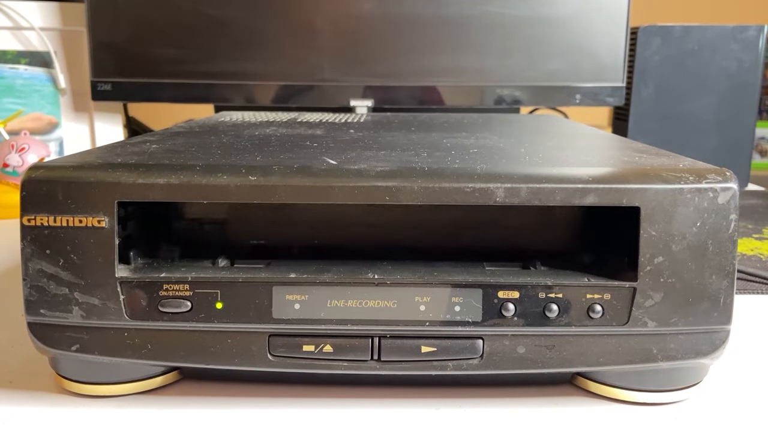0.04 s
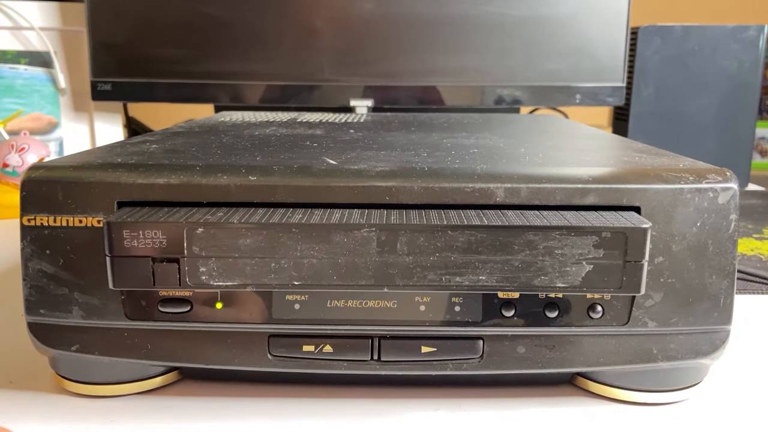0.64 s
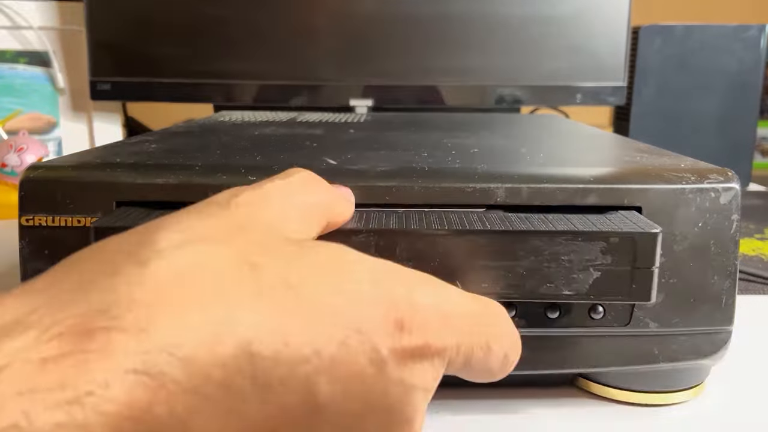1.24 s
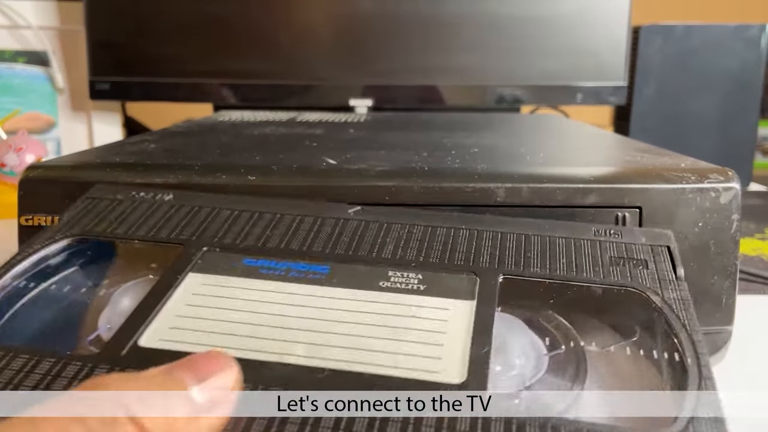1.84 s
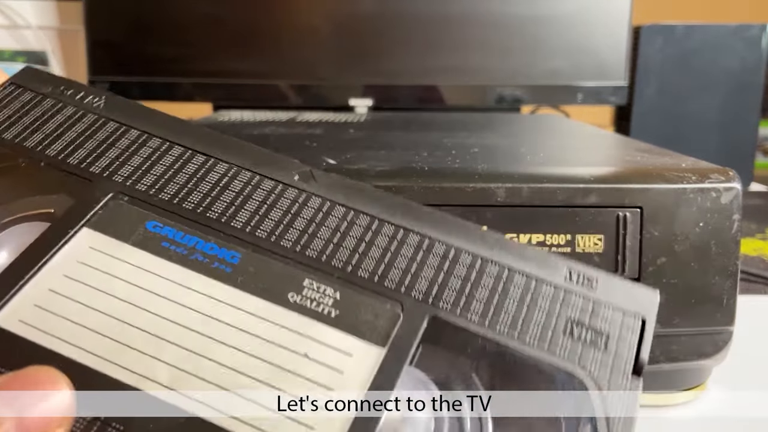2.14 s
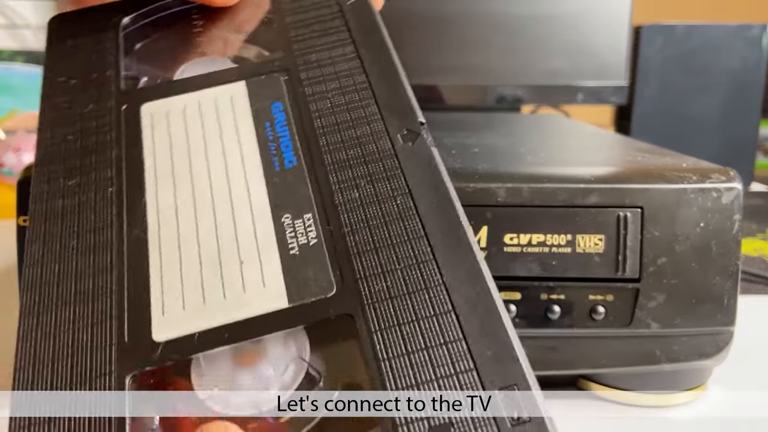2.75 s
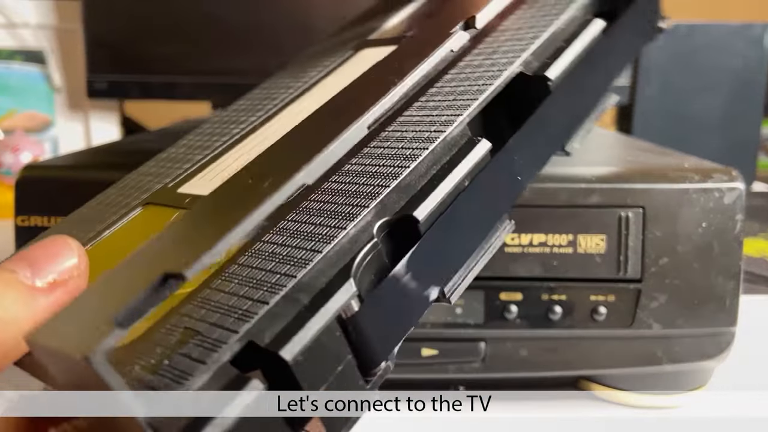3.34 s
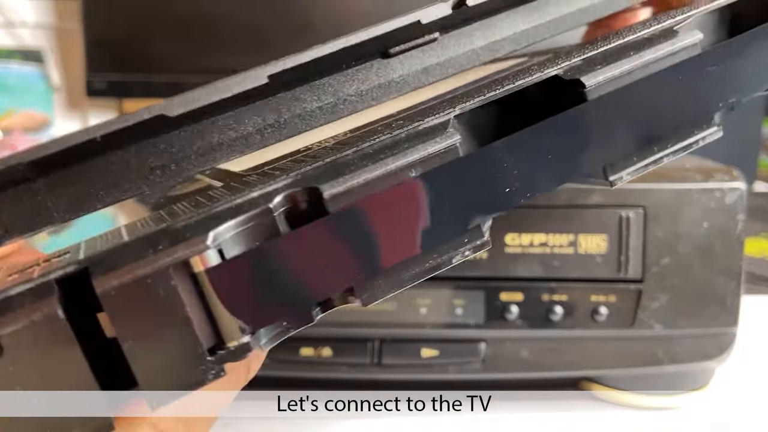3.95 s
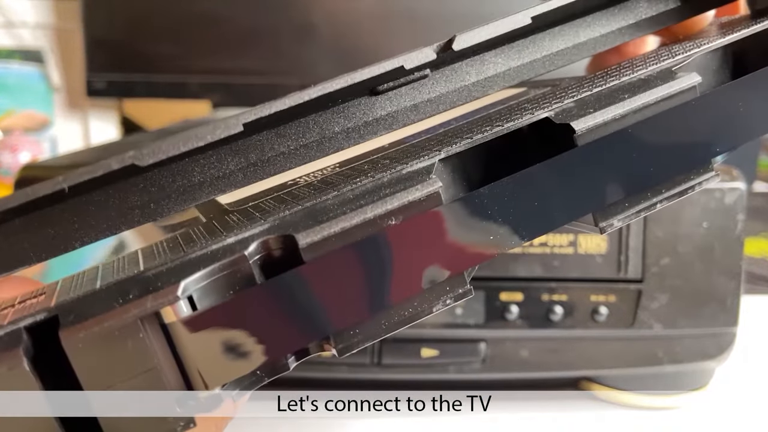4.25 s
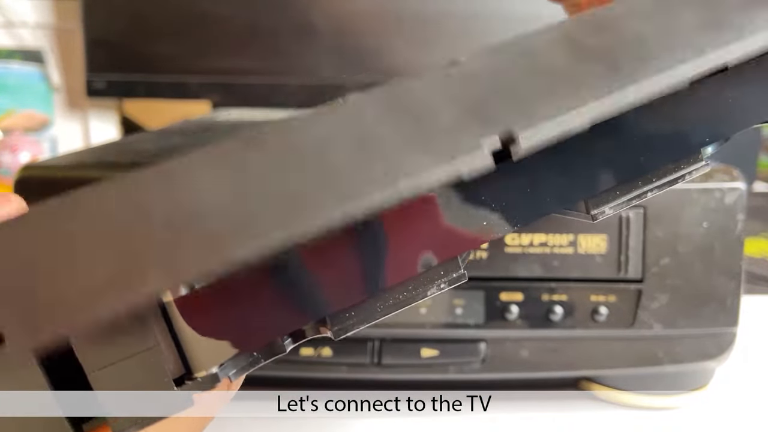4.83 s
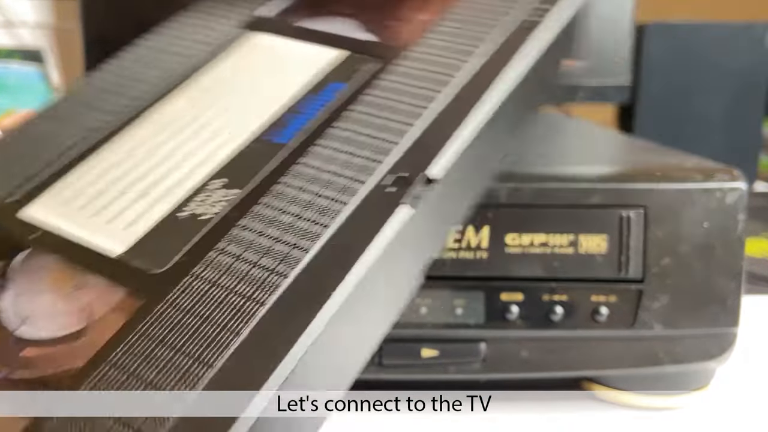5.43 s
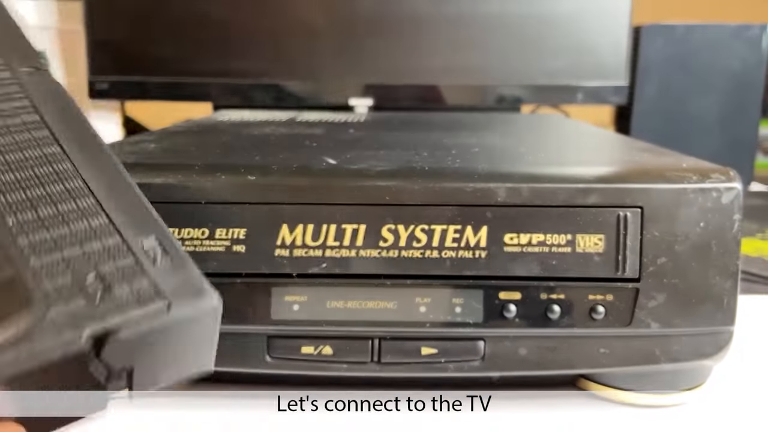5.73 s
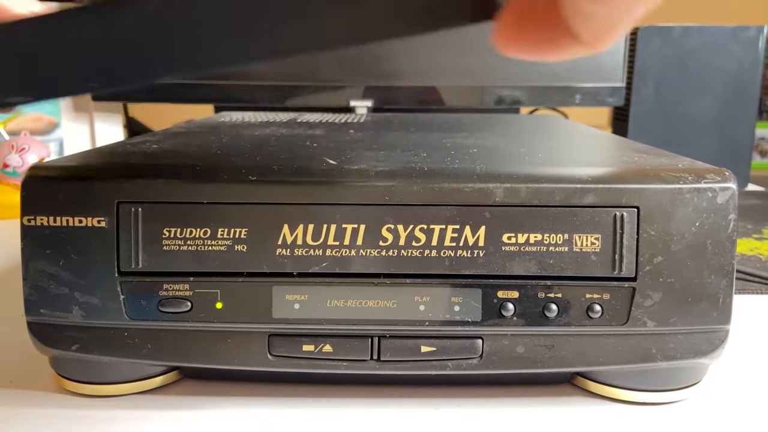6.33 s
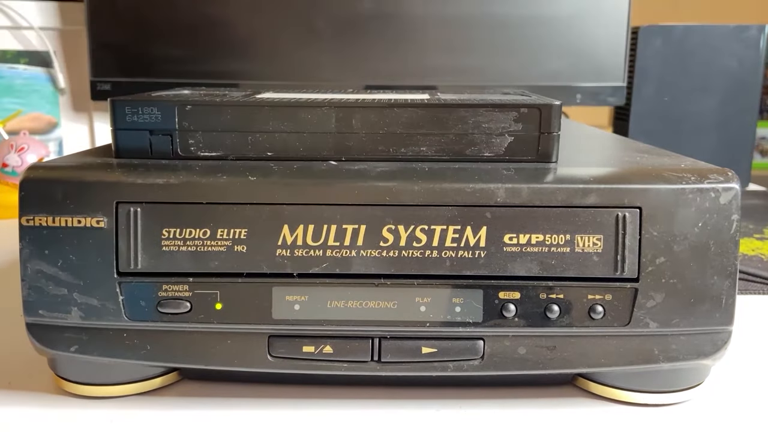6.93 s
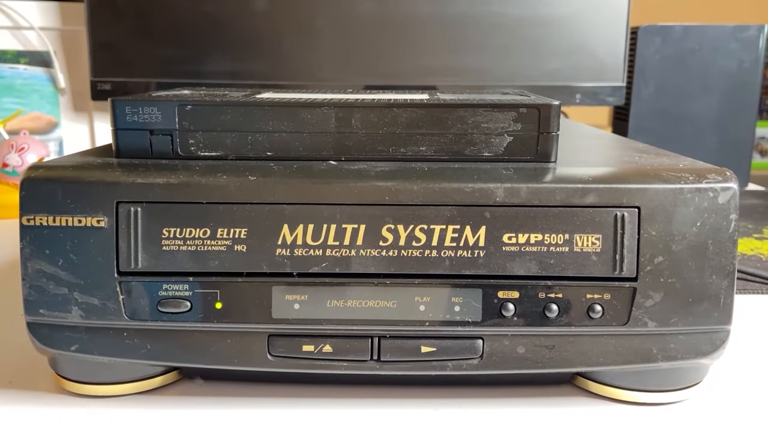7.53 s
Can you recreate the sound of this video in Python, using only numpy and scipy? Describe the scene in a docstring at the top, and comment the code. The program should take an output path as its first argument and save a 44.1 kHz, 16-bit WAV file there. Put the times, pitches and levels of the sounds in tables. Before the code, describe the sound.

Levers clack as a videotape ejects, then the plastic cassette scrapes out, rattles in the hand, snaps its flap and bumps down.

```python
"""A video cassette player on a table ejects its tape: the motor whirs, levers clack, the steel cover rings.
A hand drags the cassette out, scraping it over the slot, and turns it over so the loose reels rattle.
A spring snaps the cassette's flap shut, and the hand lays the cassette on the player with soft bumps.
Two close microphones hear it all in a small, quiet room."""
import sys
import numpy as np
from scipy import signal
from scipy.fft import rfft, irfft, next_fast_len
from scipy.io import wavfile
from scipy.ndimage import map_coordinates

SR = 44100
rng = np.random.default_rng(int(sys.argv[2]) if len(sys.argv) > 2 else 0)


def generate_wav(sig):
    """Save sig (samples, or channels by samples) to the path in sys.argv[1] as 16-bit PCM at SR."""
    pcm = np.round(np.clip(np.atleast_2d(sig).T, -1, 1) * 32767).astype(np.int16)
    wavfile.write(sys.argv[1], SR, pcm)


N = 338683
TIME = np.arange(N) / SR
HZ = np.fft.rfftfreq(2 * N, 1 / SR)
MOTOR_STOP_S = 0.49

# the eject levers clack over: (time [s], level [dB], click pitch [Hz], knock relative to level [dB])
LEVERS = [(0.267, -15, 3730, -13), (0.288, -27, 6260, -13.5), (0.308, -11.5, 5640, -13),
          (0.322, -18.5, 6000, -11.5), (0.461, -29, 6000, -5.5), (0.485, -17.5, 4900, 0.5)]
# the cassette catches in the slot and slides on: (time [s], catch level [dB], slide level [dB])
CATCHES = [(1.1062, -34, -46), (1.169, -36.5, -45.5), (1.2325, -34.5, -33.5), (1.404, -39, -36),
           (1.53, -29.5, -48), (1.6316, -25, -31.5), (1.718, -34.5, -46.5), (1.8752, -33.5, -64)]
# the loose reels knock as the grip shifts: (time [s], click level [dB], knock level [dB])
RATTLES = [(1.761, -33, -39.5), (1.84, -47, -41), (2.156, -36, -45), (2.17, -32.5, -40),
           (2.231, -40.5, -66), (2.552, -29.5, -42), (2.63, -32, -46.5), (2.684, -25, -50),
           (2.70, -22, -65), (2.708, -25, -33), (2.926, -37.5, -52.5), (2.977, -32.5, -55.5),
           (3.126, -32.5, -59), (3.173, -37, -47.5), (3.789, -50, -56), (4.633, -47.5, -54),
           (5.167, -35.5, -47.5), (5.187, -34, -48), (5.36, -45, -58.5), (5.399, -44, -49.5),
           (5.461, -43, -49), (5.488, -54, -54), (5.528, -19.5, -37.5), (5.568, -24, -43),
           (5.661, -45, -52.5), (7.323, -40.5, -56.5)]
# the cassette's corners land on the cover: (time [s], level [dB])
LANDINGS = [(6.591, -22.5), (6.629, -21), (6.685, -26), (6.695, -17), (6.704, -22)]
# soft, heavy bumps: (time [s], level [dB], pitch [Hz])
BUMPS = [(0.498, -21, 189), (0.532, -23, 200), (2.553, -30, 79.5), (3.688, -34, 78.5), (5.604, -34, 69),
         (6.242, -22.5, 85.4), (6.296, -30.5, 99.3), (6.598, -22, 111.5), (6.721, -12, 187.4),
         (6.731, -24.5, 64.4), (6.803, -31.5, 188), (7.291, -32, 158), (7.375, -24, 78.3),
         (7.54, -37.5, 55.4)]
# the tone colour of the cassette's plastic shell: (frequency [Hz], level [dB])
SHELL = [(80, -29), (170, -13), (330, -3), (500, -9), (720, -11), (1150, -15), (1500, -27), (1950, -20),
         (6000, -55)]


def player_blows():
    """Hard levers mostly click; the cassette rings the cover more as it catches and lands."""
    out = np.zeros((2, N))
    for s, db, centre_hz, knock_db in LEVERS:
        add(out, s, amp(db) * one_blow(centre_hz, knock_db, cover_db=-22.5, t60=0.061, rise=0.0004))
    for s, db, _ in CATCHES:
        add(out, s, amp(db) * one_blow(2330, knock_db=0, cover_db=-8, t60=0.074, rise=0.00084))
    for s, db in LANDINGS:
        add(out, s, amp(db) * one_blow(3920, knock_db=-4.5, cover_db=-11.5, t60=0.042, rise=0.00047))
    return out


def one_blow(centre_hz, knock_db, cover_db, t60, rise):
    """One hit on the player: the cover's ring, a click and a hollow knock."""
    out = amp(cover_db) * cover()
    add(out, 0, amp(-3) * click(centre_hz, t60, rise))
    add(out, 0, amp(knock_db) * contact(SHELL, t60=0.08, rise=0.00065))
    return out


def cover(blur_hz=16):
    """The steel cover rings once; its loose seams blur each note."""
    # the cover's notes: (pitch [Hz], level [dB], ring time [s])
    notes = [(199.1, -2, 0.35), (274.4, -15, 0.72), (337, -7.5, 0.48), (375.6, -2.5, 0.44),
             (457.3, -6, 0.42), (759, -11, 0.2264)]
    t = TIME[:SR]
    drift = np.cumsum(rng.standard_normal((len(notes), SR)), axis=1) * np.sqrt(2 * np.pi * blur_hz / SR)
    tones = sum(amp(db + rng.normal(0, 2.6)) * fade(t, t60) * np.sin(2 * np.pi * hz * t + phase)
                for (hz, db, t60), phase in zip(notes, drift))
    return tones * fade_in(t, 0.0063) * np.ones((2, 1))


def springs():
    """Springs and thin parts inside the player sing on after a jolt."""
    # ringing parts: (time [s], level [dB], pitch [Hz], ring time [s])
    notes = [(0.498, -36, 254.9, 0.65), (1.65, -42, 338.3, 1.84)]
    out, t = np.zeros((2, N)), TIME[:2 * SR]
    for s, db, hz, t60 in notes:
        tone = np.sin(2 * np.pi * hz * t + 0.5 * wobble(24)[:len(t)])
        add(out, s, amp(db) * fade(t, t60) * tone * np.ones((2, 1)))
    return out


def motor(teeth_hz=392, coast_t60=0.82):
    """The gears chatter once a tooth and shake the frame; the motor strains at each lever, then coasts."""
    # where the gears ring: (frequency [Hz], level [dB])
    gears = [(754, 3.5), (1150, 2.5), (1560, -1.5), (2400, -10.5), (3420, -20.5), (6580, -17.5)]
    # the frame's tone colour: (frequency [Hz], level [dB])
    frame = [(25, -43.5), (59, 6), (140, -6.5), (205, 0.5), (299, -8.5), (385, -3.5), (560, -27),
             (1500, -52)]
    strain_db = 4.5 * np.max([swell(s, width=0.033) for s, *_ in LEVERS], axis=0)
    since_stop = np.maximum(TIME - MOTOR_STOP_S, 0)
    drive = amp(-40 + strain_db) * fade(since_stop, coast_t60)
    whir = amp(-54.5 + 1.5 * strain_db) * fade(since_stop, coast_t60 / 3)
    phase = 2 * np.pi * np.cumsum(teeth_hz * (1 + 0.0099 * wobble(12))) / SR
    chatter = rng.standard_normal((2, N)) * amp(2.8 * wobble(120))
    teeth = unit(resonant(chatter * (1 + amp(-8) * np.cos(phase)), gears, sharpness=7.2))
    whine = amp(-13) * drive * np.sin(phase) + amp(-11.5) * whir * np.sin(4 * phase)
    rumble = drive * friction(frame, grain_db=2.5, grain_rate=80)
    return rumble + amp(3.5) * whir * teeth + whine


def spin_down(start_hz=1060, sag_hz_per_s=300):
    """The freed gears slow down: a faint, rough whine sinks under a high whir that holds its pitch."""
    hz = np.maximum(start_hz - sag_hz_per_s * np.maximum(TIME - MOTOR_STOP_S, 0), 0)
    whir = amp(-68) * rough_tone(hz, width_hz=110) + amp(-76) * rough_tone(2780, width_hz=500)
    return jolt(MOTOR_STOP_S, rise=0.057, t60=1.8) * whir


def flap():
    """The spring slams the flap shut: it cracks and chatters, and the shell knocks and rings."""
    # the flap is let go and hits the shell: (time [s], crack level [dB], knock level [dB])
    hits = [(4.8801, -19.5, -39), (4.901, -4, -37.5), (4.902, -8.5, -23.5), (4.9032, -14.5, -9.5)]
    # the tone colour of its edge striking: (frequency [Hz], level [dB])
    edge = [(710, -36), (1400, -15), (1900, -4.5), (2500, -9.5), (2970, -1.5), (3600, -8.5), (5900, 0),
            (7800, -3), (11100, -6), (15500, -12)]
    out = np.zeros((2, N))
    knock = coloured(signal.unit_impulse(SR // 8), SHELL)
    knock = knock / np.abs(knock).max() * np.ones((2, 1))
    for s, crack_db, knock_db in hits:
        add(out, s, amp(crack_db) * contact(edge, t60=0.033))
        add(out, s, amp(knock_db) * knock)
        add(out, s, amp(knock_db - 10.5) * shell_ring(rise=0.0042))
    return out


def rattles():
    """Loose reels click and knock inside the shell and make it ring."""
    out = np.zeros((2, N))
    for s, click_db, knock_db in RATTLES:
        add(out, s, amp(click_db - 6) * click(centre_hz=2880, t60=0.03, rise=0.0016))
        add(out, s, amp(knock_db + 4) * contact(SHELL, t60=0.05, rise=0.02))
        add(out, s, amp(knock_db + 6) * shell_ring(rise=0.003, detune=0.019))
    return out


def latch():
    """The flap and its latch give short, bright ticks."""
    # ticks: (time [s], level [dB])
    ticks = [(1.664, -15.5), (2.155, -27), (3.0, -11.5), (3.72, -39.5), (5.61, -36.5), (6.042, -30.5)]
    out = np.zeros((2, N))
    for s, db in ticks:
        add(out, s, amp(db - 8) * click(centre_hz=8370, t60=0.016, rise=0.0011))
    return out


def shell_ring(rise, scatter_db=2, detune=0.027):
    """The shell rings a little differently wherever it is struck; its high notes shift most."""
    # the notes of its air and panels: (pitch [Hz], level [dB], ring time [s])
    notes = [(705.3, 0.5, 0.049), (783.6, -5.5, 0.05), (1155, -11, 0.054), (1855, -10, 0.028),
             (2870, -9.5, 0.034)]
    t, lowest_hz = TIME[:SR // 8], notes[0][0]
    tones = np.zeros((2, len(t)))
    for hz, db, t60 in notes:
        louder, higher = rng.standard_normal(2)
        pitch = hz * (1 + detune * higher * hz / lowest_hz)
        tones += amp(db + scatter_db * louder) * fade(t, t60) * np.sin(2 * np.pi * pitch * t)
    return tones * fade_in(t, rise)


def drag():
    """The ribbed shell shudders and scrapes over the lip of the slot, lurching on after each catch."""
    # the low shudder's tone colour: (frequency [Hz], level [dB])
    slot = [(25, -33.5), (65, 6.5), (136, -2), (320, 2.5), (400, 2.5), (540, -18.5), (720, -11.5),
            (1200, -45)]
    # the scrape's tone colour: (frequency [Hz], level [dB])
    lip = [(400, -44), (750, 3.5), (1170, 2), (1400, -1), (4300, -12.5), (7400, -14.5), (11700, -28.5),
           (14000, -59)]
    first, last = CATCHES[0][0], CATCHES[-1][0]
    pull = amp(-43.5) * arch(first, last - first) ** 2
    shudder = pull + sum(amp(db) * jolt(s, rise=0.0042, t60=0.8) for s, _, db in CATCHES)
    scrape = pull + sum(amp(db) * jolt(s, rise=0.0042, t60=0.43) for s, _, db in CATCHES)
    grit = friction(lip, grain_db=4.2, grain_rate=240)
    # a hollow note wanders as the touching point slides along the shell
    grit += amp(-6) * rough_tone(950 * np.exp(0.22 * wobble(16)), width_hz=200)
    return amp(-3) * shudder * friction(slot, grain_db=0.5, grain_rate=48) + amp(-9.5) * scrape * grit


def groans():
    """Where the shell sticks in the slot, one hollow note stands out, its pitch set by the spot."""
    # tight spots: (time [s], level [dB], pitch [Hz])
    spots = [(1.117, -46, 1158), (1.657, -31.5, 764), (1.723, -36, 1020)]
    return sum(amp(db) * swell(s, width=0.0075) * rough_tone(hz, width_hz=190) for s, db, hz in spots)


def bumps(ring_cycles=12.5):
    """Soft weight lands on the player or table: a few low notes die fast together, and the deepest bumps ring
    longest."""
    # the notes of one bump: (pitch [ratio], level [dB])
    notes = [(0.68, -15), (1, 0.5), (1.27, -11.5), (1.65, -11)]
    out, t = np.zeros((2, N)), TIME[:SR // 2]
    for s, db, hz in BUMPS:
        thud = sum(amp(level) * np.sin(2 * np.pi * hz * ratio * t + rng.uniform(0, 2 * np.pi))
                   for ratio, level in notes)
        soft_start = 1 - np.exp(-(t * hz) ** 2)
        add(out, s, amp(db) * thud * fade(t, ring_cycles / hz) * soft_start * np.ones((2, 1)))
    return out


def hands():
    """Skin hisses and rubs on the hollow shell: in strokes, at each rattle and as the cassette settles."""
    # fingers slide over the shell: (time [s], length [s], level [dB])
    slides = [(2.276, 0.11, -69), (2.463, 0.075, -63.5), (2.578, 0.06, -71), (2.795, 0.23, -72),
              (3.402, 0.11, -61), (3.137, 0.3, -76), (3.586, 0.1, -72), (3.871, 0.17, -86.5),
              (4.19, 0.059, -85), (4.696, 0.13, -71), (4.82, 0.27, -55.5), (5.349, 0.3, -68),
              (5.674, 0.19, -62.5), (5.872, 0.15, -61.5), (6.021, 0.23, -57), (6.953, 0.2, -65),
              (7.292, 0.094, -66)]
    # the tone colour of sliding skin: (frequency [Hz], level [dB])
    skin = [(590, -29.5), (1300, -5), (7000, -5.5), (15000, -13.5)]
    strokes = sum(amp(db) * arch(s, length) for s, length, db in slides)
    grips = sum(amp(db - 26.5) * swell(s + 0.018, width=0.075) for s, _, db in RATTLES)
    settling = sum(amp(db) * jolt(s, rise=0.004, t60=0.19) for s, db in LANDINGS)
    hiss_level = strokes + amp(-13) * grips + amp(-31) * settling
    rub_level = amp(-5.5) * strokes + grips + amp(-23) * settling
    snags = slips(rate=35, t60=0.04)
    hiss = hiss_level * friction(skin, grain_db=2.5, grain_rate=560) * (1 + 2 * snags)
    rub = rub_level * friction(SHELL, grain_db=4, grain_rate=63) * (1 + 4 * snags)
    return hiss + rub


def table():
    """The table rumbles dully: a little at rest, more as things are moved and after each bump."""
    # slow swells of rumble: (time [s], length [s], level [dB])
    moves = [(0.557, 0.57, -55), (2.05, 0.77, -54.5), (3.255, 0.88, -61.5), (5.29, 1.2, -52.5)]
    # the table's tone colour: (frequency [Hz], level [dB])
    colour = [(25, -43.5), (50, -7), (80, 0), (200, -18), (900, -54.5)]
    moving = sum(amp(db) * arch(s, length) for s, length, db in moves)
    bumped = sum(amp(db - 17.5) * jolt(s, rise=0.0037, t60=0.528) for s, db, _ in BUMPS)
    return amp(-4.5) * (amp(-63.5) + moving + bumped) * friction(colour, grain_db=5, grain_rate=20)


def room(pair):
    """The walls send back a wash of echoes; each frequency dies at its own speed."""
    # how long the room rings: (frequency [Hz], ring time [s])
    ring_times = [(100, 0.37), (1000, 0.53), (6000, 0.36), (13000, 0.26)]
    hz, t, noise = signal.stft(rng.standard_normal((2, SR)), SR, nperseg=256)
    dying = noise * fade(t, along(ring_times, hz)[:, None]) * fade_in(t, 0.0004)
    tail = signal.istft(dying, SR, nperseg=256)[1]
    one, other = signal.fftconvolve(pair, tail / np.linalg.norm(tail[0]), axes=1)[:, :N]
    return np.array([one + other, one - other]) / np.sqrt(2)


def background():
    """Still air and a faint electrical whine."""
    # the whine: (pitch [Hz], level [dB])
    whine = [(1099, -91)]
    # the air's tone colour: (frequency [Hz], level [dB])
    air = [(25, -13.5), (83, -19.5), (300, -12.5), (1090, -21), (1400, -25.5), (7500, -36.5),
           (15000, -47.5)]
    tones = sum(amp(db) * np.sqrt(2) * np.sin(2 * np.pi * hz * TIME + 0.5 * wobble(4.5))
                for hz, db in whine)
    return amp(-78) * unit(coloured(rng.standard_normal((2, N)), air)) + tones


def click(centre_hz, t60, rise):
    """Hard plastic is hit; a higher centre sounds brighter."""
    colour = [(centre_hz / 10, -20), (centre_hz / 2, -3), (centre_hz, 0),
              (centre_hz * 2, -8), (centre_hz * 4, -22)]
    return contact(colour, t60, rise)


def contact(colour, t60, rise=0.0012):
    """A brief burst of tiny collisions, heard through an object's tone colour."""
    t = TIME[:SR // 8]
    burst = coloured(rng.standard_normal((2, len(t))) * fade(t, t60) * fade_in(t, rise), colour)
    return burst / np.linalg.norm(burst, axis=1, keepdims=True) * np.sqrt(t60 * SR) / 10


def friction(colour, grain_db, grain_rate):
    """Rubbing noise that catches and slips in small grains."""
    return unit(coloured(rng.standard_normal((2, N)) * amp(grain_db * wobble(grain_rate)), colour))


def slips(rate, t60):
    """A loudness curve of sudden, random snags, a few strong and many weak."""
    kicks = (rng.random(N) < rate / SR) * rng.random(N) ** 2
    return signal.fftconvolve(kicks, fade(TIME[:SR // 8], t60))[:N]


def rough_tone(hz, width_hz):
    """A noisy tone around a steady or gliding pitch."""
    phase = 2 * np.pi * np.cumsum(hz * np.ones(N)) / SR
    return wobble(width_hz) * np.cos(phase) + wobble(width_hz) * np.sin(phase)


def resonant(x, notes, sharpness):
    """Make a sound ring at the given notes: (frequency [Hz], level [dB])."""
    response = sum(amp(db) / (1 + 1j * sharpness * (HZ / hz - hz / (HZ + 1))) for hz, db in notes)
    return irfft(rfft(x, 2 * N) * response)[..., :N]


def coloured(x, colour):
    """Give a sound a tone colour: (frequency [Hz], level [dB])."""
    size = next_fast_len(x.shape[-1] + 4096)
    cepstrum = irfft(np.log(amp(along(colour, np.fft.rfftfreq(size, 1 / SR)))), size)
    # fold the filter so that it rings only after a sound, never before
    cepstrum[1:size // 2] *= 2
    cepstrum[size // 2 + 1:] = 0
    return irfft(rfft(x, size) * np.exp(rfft(cepstrum)), size)[..., :x.shape[-1]]


def along(points, hz):
    """Read between (frequency [Hz], value) points, with octaves evenly spaced."""
    frequencies, values = np.transpose(points)
    return np.interp(np.log(hz + 1), np.log(frequencies), values)


def wobble(rate):
    """A smooth curve through rate random values a second."""
    return map_coordinates(rng.standard_normal(int(N * rate / SR) + 4), [TIME * rate])


def swell(s, width):
    """A smooth hump of height 1 around time s."""
    return np.exp(-((TIME - s) / width) ** 2)


def arch(s, length):
    """The speed of one hand movement: half a sine from time s."""
    return np.sin(np.pi * np.clip((TIME - s) / length, 0, 1))


def jolt(s, rise, t60):
    """A loudness curve that jumps up at time s and dies away."""
    t = np.maximum(TIME - s, 0)
    return fade_in(t, rise) * fade(t, t60)


def fade_in(t, rise):
    """Climb from 0 towards 1, most of the way in rise seconds."""
    return 1 - np.exp(-t / rise)


def fade(t, t60):
    """Die away by 60 dB in t60 seconds, the ring time."""
    return np.exp(-np.log(1000) * t / t60)


def amp(db):
    """Turn decibels into a multiplier."""
    return 10 ** (np.asarray(db) / 20)


def unit(x):
    """Scale to an average power of 1."""
    return x / np.sqrt(np.mean(x ** 2) + 1e-20)


def add(track, s, sound):
    """Mix a sound in at time s."""
    start = round(s * SR)
    track[:, start:start + sound.shape[-1]] += sound[:, :N - start]


def left_right(pair):
    """Turn mid (shared) and side (difference) into left and right; the bass is alike in both."""
    # stereo width: (frequency [Hz], side level [dB])
    width = [(60, -25.5), (250, -13.5), (1500, -2.5), (9000, -3)]
    mid, side = pair[0], coloured(pair[1], width)
    return np.array([mid + side, mid - side])


def close_up(pair):
    """The very close flap sounds alike at both microphones but reaches the left one later."""
    # the flap's place between them: (frequency [Hz], left minus right [dB])
    lean = [(900, -1.5), (2400, 3), (4400, 5), (9000, 1)]
    left, right = left_right(pair * amp([[0], [-7]]))
    left = coloured(np.roll(left, 1), [(hz, db / 2) for hz, db in lean])
    right = coloured(right, [(hz, -db / 2) for hz, db in lean])
    return np.array([left, right])


def scene():
    """Player, cassette and hands in the room."""
    snap = flap()
    knocks = player_blows() + springs() + rattles() + latch()
    movement = motor() + spin_down() + drag() + groans() + hands() + bumps() + table()
    echo = room(amp(-15) * snap + amp(-12.5) * knocks + amp(-7) * movement)
    return close_up(snap) + left_right(knocks + movement + echo + background())


def record(dry):
    """The treble has narrow dips near 9 and 13 kHz, and there is no sound above about 16 kHz."""
    # the overall tone colour: (frequency [Hz], level [dB])
    colour = [(8300, 1), (9150, -21), (9800, 1), (12000, 1.5), (13200, -19.5), (14800, -7.5),
              (16000, -18.5)]
    top_hz = 16300
    return irfft(rfft(coloured(dry, colour), 2 * N) * (HZ < top_hz))[:, :N]


dry = scene()
out = record(dry)
generate_wav(out)
```